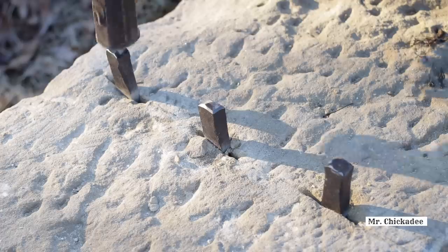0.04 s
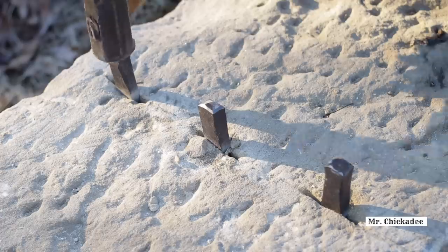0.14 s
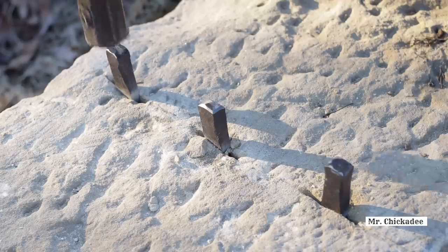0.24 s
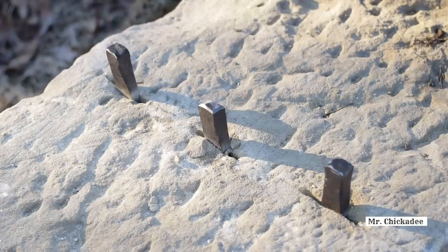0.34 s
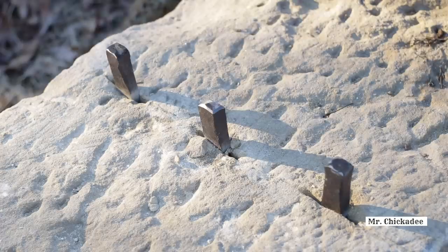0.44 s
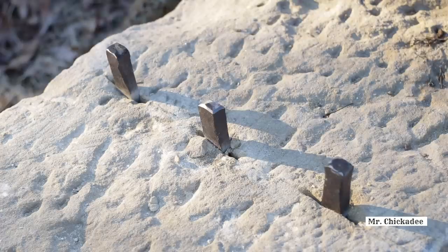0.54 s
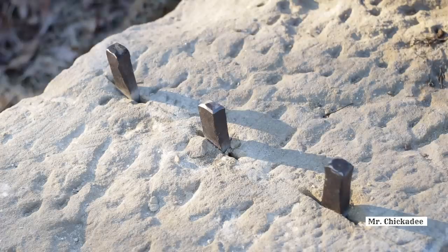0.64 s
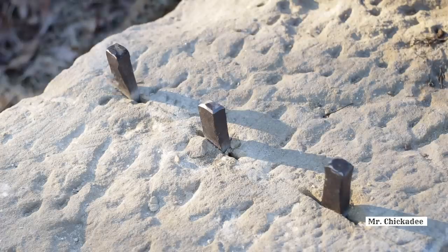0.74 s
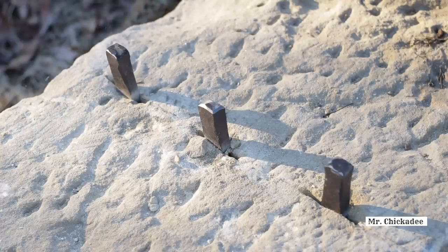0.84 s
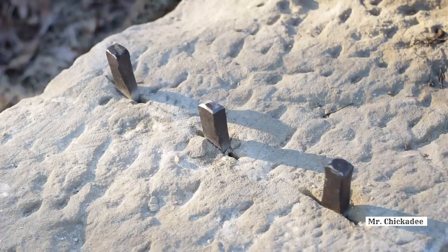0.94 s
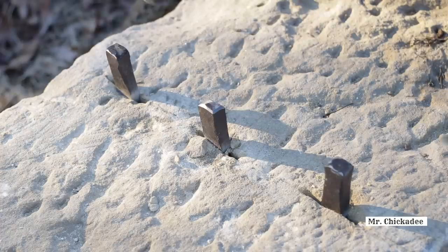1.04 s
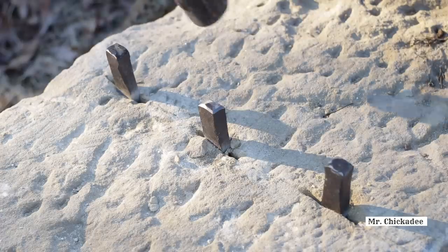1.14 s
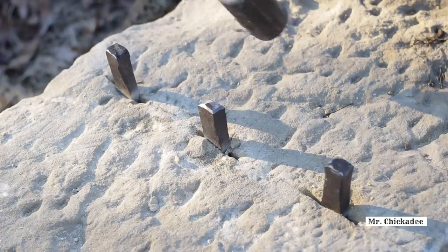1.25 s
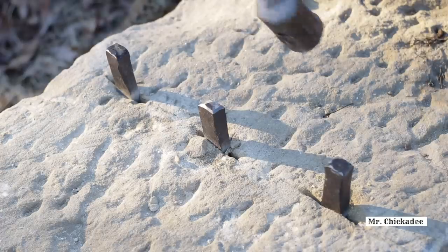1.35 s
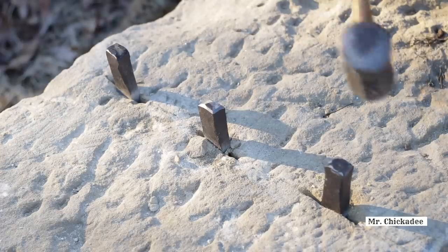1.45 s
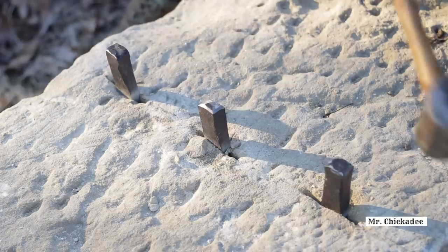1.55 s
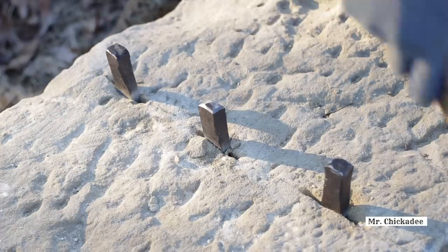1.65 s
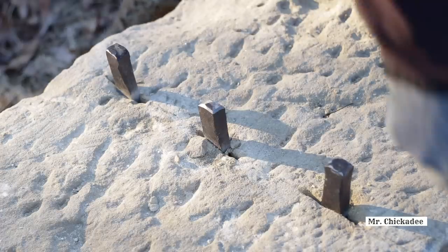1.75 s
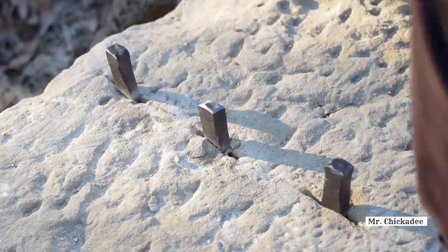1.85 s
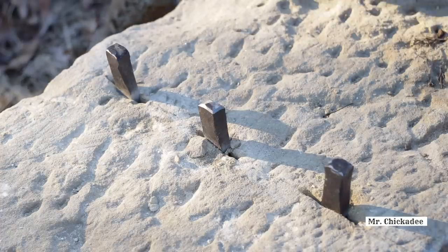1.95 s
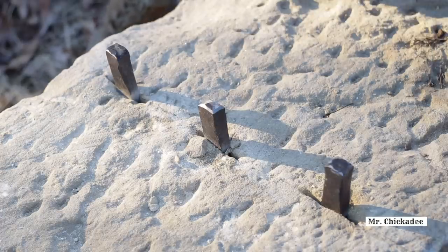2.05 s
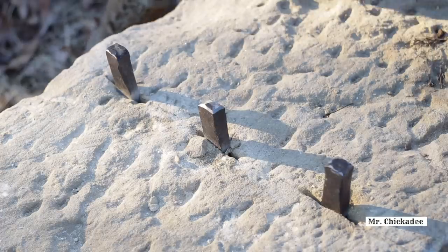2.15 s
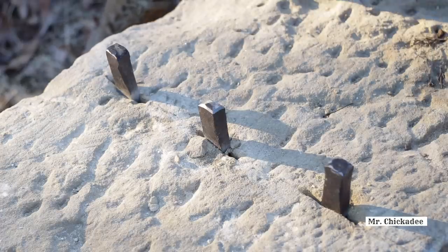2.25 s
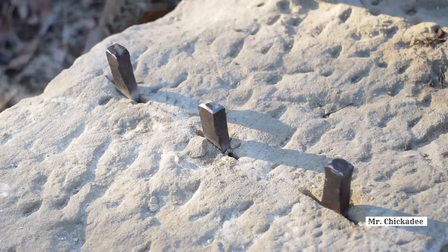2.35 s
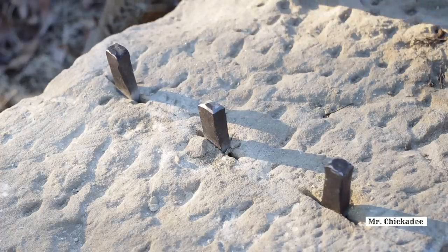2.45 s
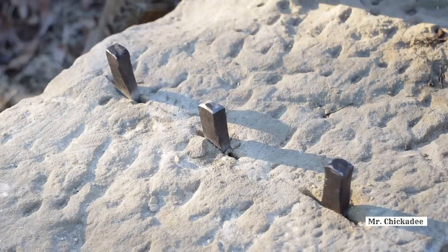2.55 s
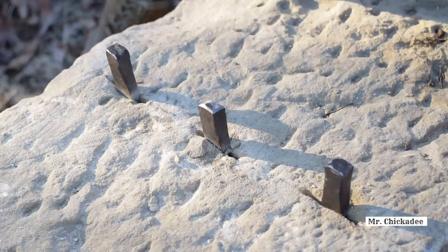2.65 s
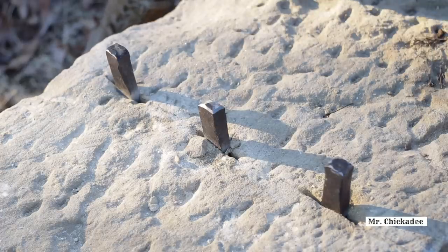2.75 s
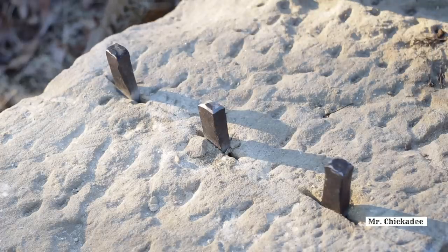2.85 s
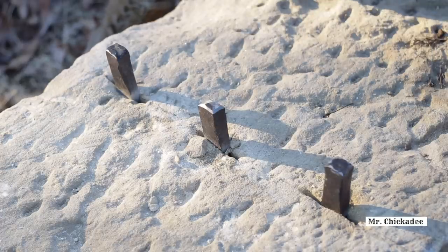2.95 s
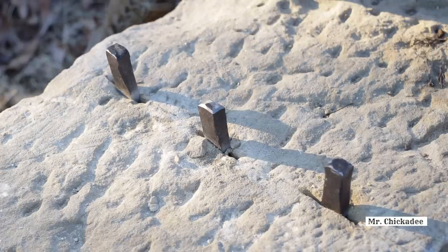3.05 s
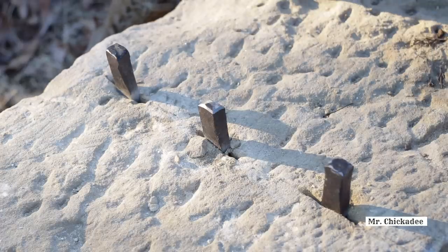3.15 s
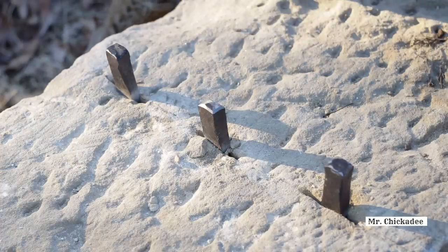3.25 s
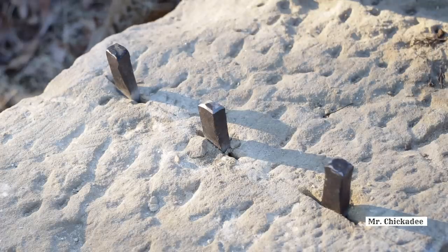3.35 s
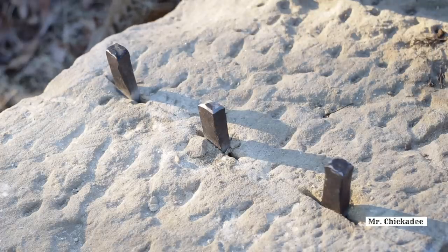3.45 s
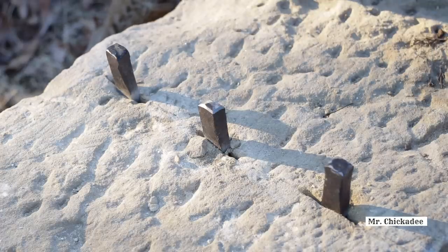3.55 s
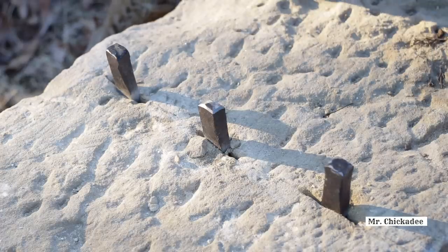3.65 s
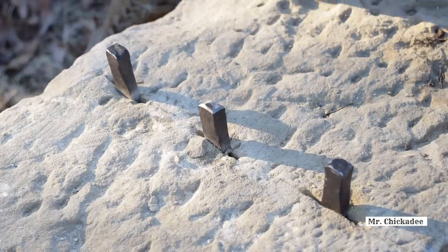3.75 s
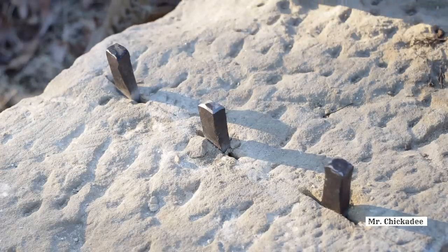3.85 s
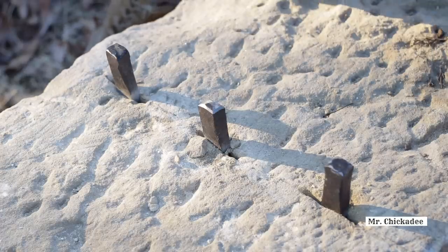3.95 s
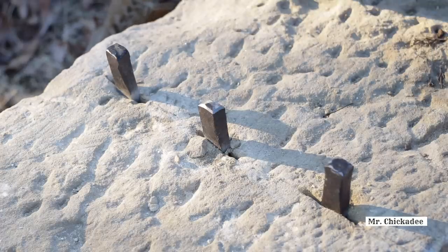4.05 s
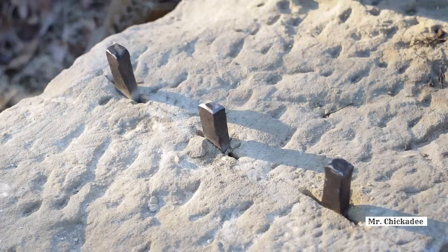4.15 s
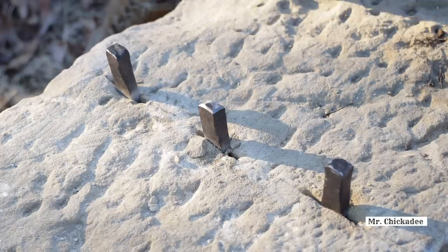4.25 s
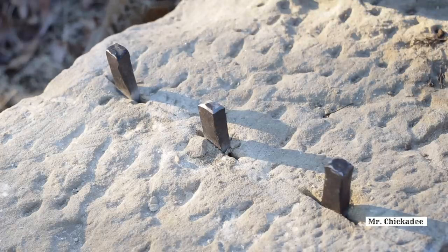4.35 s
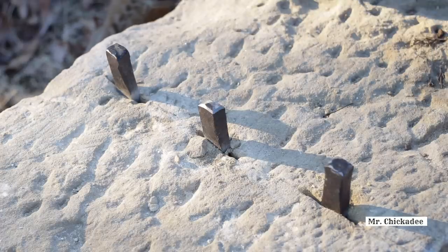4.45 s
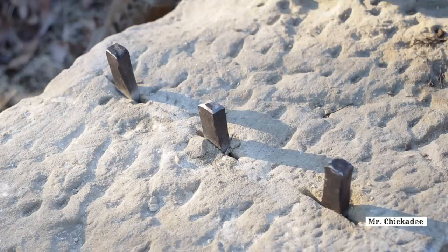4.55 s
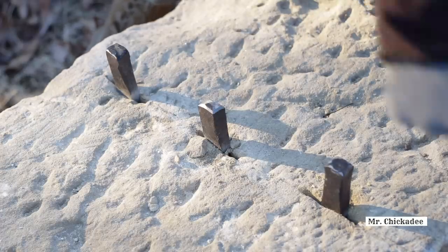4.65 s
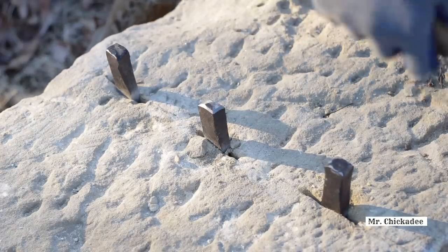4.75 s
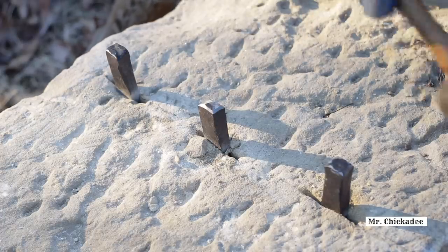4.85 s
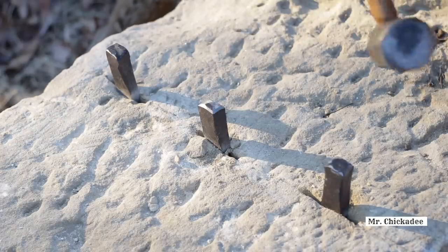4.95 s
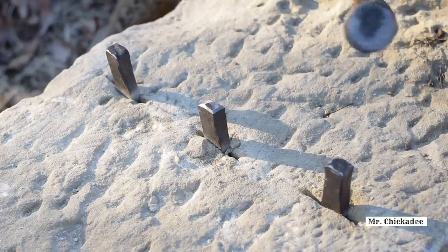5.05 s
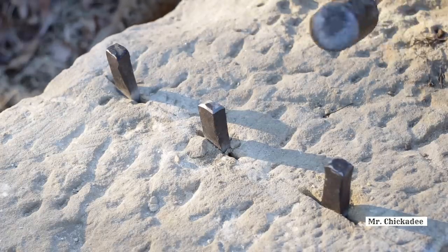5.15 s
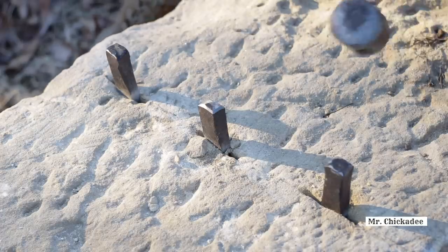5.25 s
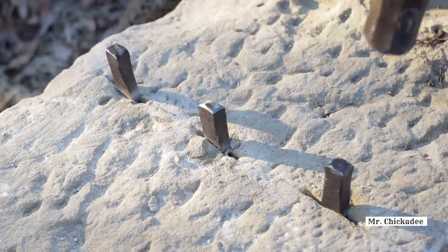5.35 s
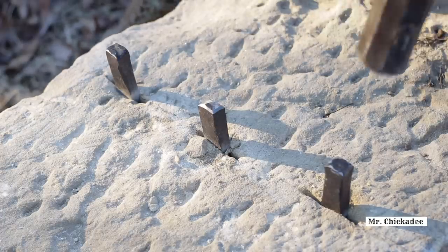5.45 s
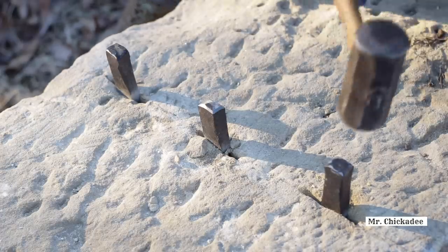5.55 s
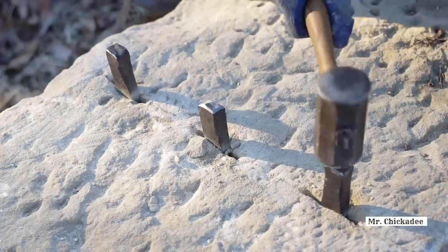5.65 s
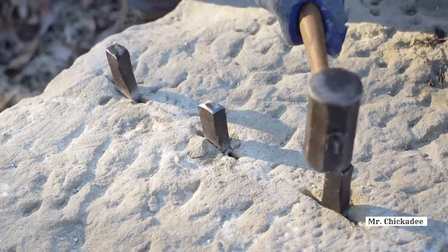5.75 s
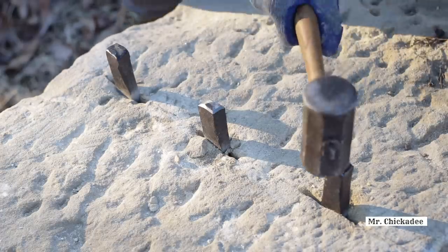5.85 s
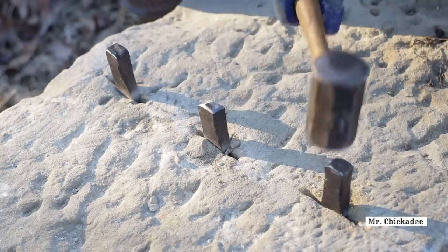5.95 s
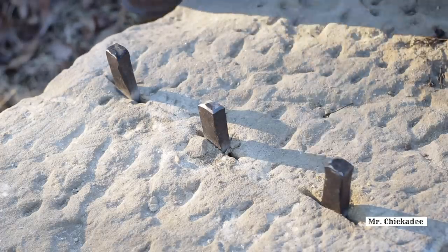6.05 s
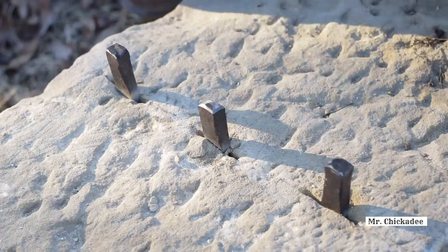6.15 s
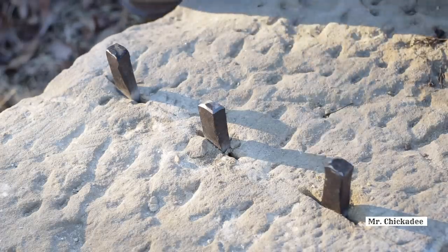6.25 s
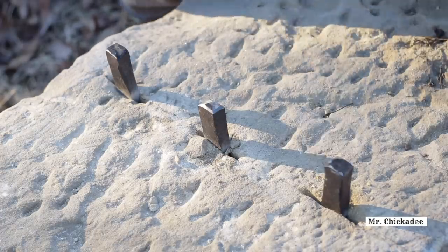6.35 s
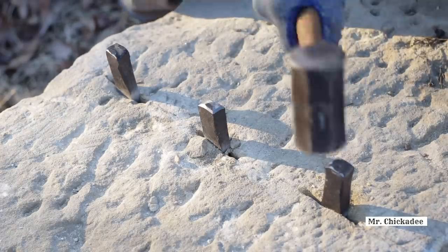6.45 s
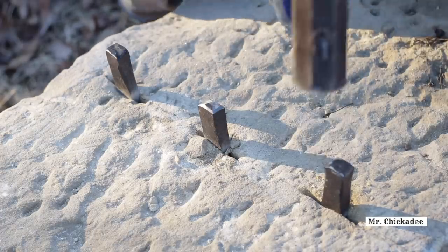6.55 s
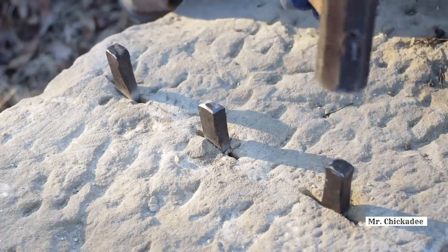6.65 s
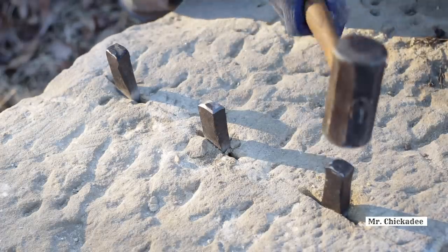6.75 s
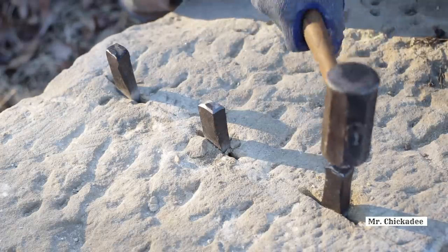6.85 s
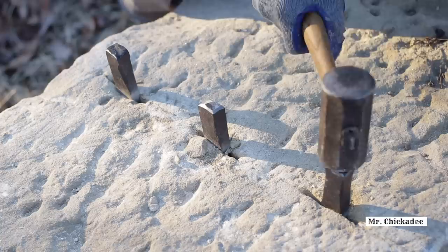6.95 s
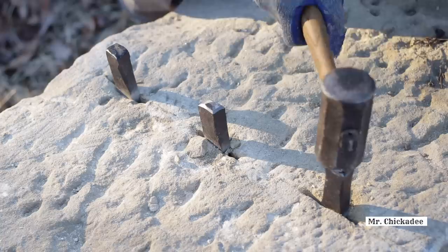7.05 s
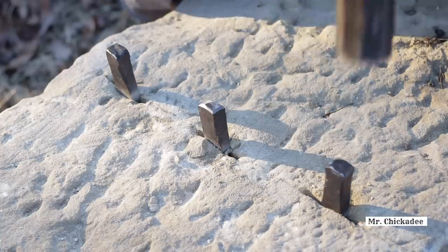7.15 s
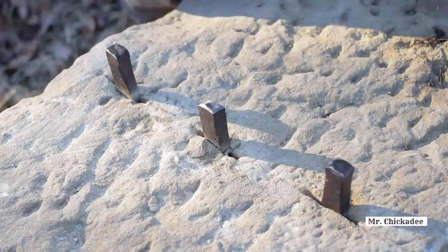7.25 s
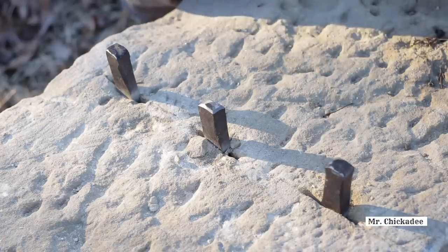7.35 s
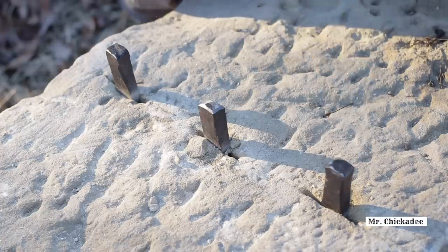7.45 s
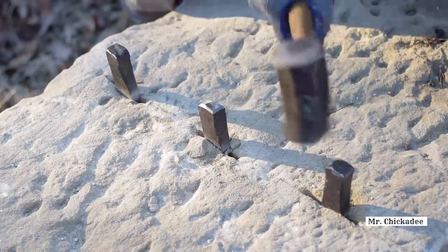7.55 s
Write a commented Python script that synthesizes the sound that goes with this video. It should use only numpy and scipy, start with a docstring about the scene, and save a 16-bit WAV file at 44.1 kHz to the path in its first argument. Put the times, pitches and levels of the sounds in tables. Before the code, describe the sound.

A near stereo microphone hears a hand hammer working along four wedges in rock. Small quick taps, sometimes bouncing, set up each single loud steel crack, the hardest slightly overloaded. Each wedge has its own clanking colour and a brief body of stone beneath. Between blows come soft sleeve swishes, tiny grit ticks, a faint far motor and two barely audible thin whistles. Quiet open woodland answers with a soft scattered echo.

```python
"""Two light taps of a hammer on a steel wedge come first, then a hard, clanking blow, outdoors and close by.
The hammer works along four wedges set in a stone block; bouncing taps lead to each hard blow, twice on the last.
Struck steel and stone are damped resonances; rocks, thicket and far trees answer with scattered noise.
Banded noise swells make rustling sleeves, trickling sand and treble echo after two hard blows; short bursts
make grit ticks, and sines a distant motor and two far whistles. The input stage overloads on the hard blows."""
import sys
import numpy as np
from scipy import signal
from scipy.fft import rfft, irfft, next_fast_len
from scipy.io import wavfile
from scipy.ndimage import uniform_filter1d

SR = 44100
rng = np.random.default_rng(int(sys.argv[2]) if len(sys.argv) > 2 else 0)


def wav_record(signal):
    """Record a signal, one row per channel, as 16-bit PCM in the file named by sys.argv[1]."""
    frames = np.transpose(np.atleast_2d(signal))
    bounded = np.clip(frames, -1, 1)
    # unit amplitude maps onto the largest positive 16-bit level
    quanta = np.round(bounded * 32767).astype(np.int16)
    wavfile.write(sys.argv[1], SR, quanta)


N = 334719
PORTS = np.array([[1], [-1]])  # sign of a left-right difference at the left and right port


def amp(db):
    """Level to amplitude: 20 dB is a factor of ten."""
    return 10 ** (np.asarray(db) / 20)


def unit(x):
    """Normalization of x to rms 1."""
    return x / np.sqrt(np.mean(x ** 2) + 1e-20)


def peak(x):
    """Normalization of x to peak 1."""
    return x / np.abs(x).max()


def along(points, hz):
    """Interpolation of (frequency [Hz], value) points on a logarithmic frequency axis."""
    f, v = np.transpose(points)
    return np.interp(np.log(hz + 1), np.log(f + 1), v)


def curves(rows):
    """Linear interpolation in time: one value per sample for each column after the time."""
    s, *cols = np.transpose(rows)
    return [np.interp(np.arange(N) / SR, s, c) for c in cols]


def filtered(x, response):
    """Linear filtering: the spectrum of x times a complex response of frequency."""
    size = next_fast_len(x.shape[-1] + 8192)  # padding leaves room for the ringing
    spectrum = rfft(x, size) * response(np.fft.rfftfreq(size, 1 / SR))
    return irfft(spectrum, size)[..., :x.shape[-1]]


def modes(table):
    """Modal superposition: damped resonances (frequency [Hz], width [Hz], level [dB]) in alternating sign."""
    def response(f):
        total = 0
        for k, (centre, width, db) in enumerate(table):
            resonance = 1j * f * width / (centre ** 2 - f ** 2 + 1j * f * width)
            total = total + (-1) ** k * amp(db) * resonance
        return total
    return response


def add(track, s, sound):
    """Superposition: mixes a stereo sound in at time s [s]."""
    start = min(round(s * SR), N)
    track[:, start:start + sound.shape[1]] += sound[:, :N - start]


# likeness of the two ports in diffuse noise: (frequency [Hz], left-right correlation)
COHERENCE = [(60, 0.64), (130, 0.2), (290, 0.99), (640, 0.41), (1410, -0.34), (3100, 0.21), (6820, 0.033),
             (15000, 0.74)]


def rush(spectrum, patchy_db):
    """Partial coherence: mid and side noise, patchy in time and pitch, share power to give the likeness."""
    z = signal.stft(rng.standard_normal((2, N)), nperseg=256)[2]
    field = uniform_filter1d(rng.standard_normal(z.shape[1:]), size=8, axis=0)
    field = uniform_filter1d(field, size=6, axis=1)
    pair = signal.istft(z * amp(patchy_db * unit(field)), nperseg=256)[1][:, :N]

    def mid_side(hz):
        turn = np.arccos(np.clip(along(COHERENCE, hz), -1, 1)) / 2
        return amp(along(spectrum, hz)) * [np.cos(turn), np.sin(turn)]

    mid, side = filtered(pair, mid_side)
    return unit(np.array([mid + side, mid - side]))


# colour of the open-air floor: (frequency [Hz], relative level per hertz [dB])
AIR_COLOUR = [(13, -48.5), (22, -19), (81, -9), (162, -11), (219, -9), (252, -11), (415, -12), (852, -13),
              (978, -12), (1800, -14.5), (3220, -18), (15200, -27.5), (16500, -39.5)]


def open_air():
    """Diffuse field: a steady, slightly patchy floor of coloured noise."""
    return amp(-59.5) * rush(AIR_COLOUR, patchy_db=1.46)


# far engine: (time [s], frequency [Hz], peak level [dB])
MOTOR_NOTE = [(0, 120, -73), (3.4, 122, -84), (3.8, 130, -70), (4.15, 133, -66.5), (4.5, 136, -71.5),
              (5.3, 137, -72.5), (5.7, 136, -75), (7.59, 138, -74)]
UPPER_S, UPPER_HALF_S, UPPER_DB = 4.08, .16, -66  # brief upper note: centre, time to fall to 1/e, peak


def motor():
    """Phase accumulation: a far engine note of drifting pitch; a second note above it passes briefly."""
    hz, db = curves(MOTOR_NOTE)
    phase = 2 * np.pi * np.cumsum(hz) / SR
    passing = np.exp(-((np.arange(N) / SR - UPPER_S) / UPPER_HALF_S) ** 2)
    return amp(db) * np.sin(phase) + amp(UPPER_DB) * passing * np.sin(phase * 8 / 5)


# far whistles: (time [s], length [s], start frequency [Hz], end frequency [Hz], peak level [dB])
GLIDES = [(3.941, .07, 1805, 1740, -69), (5.16, .17, 1716, 1790, -69)]


def whistles():
    """Linear frequency glide: thin pure tones, perhaps a far bird."""
    out = np.zeros((2, N))
    for s, length, start_hz, end_hz, db in GLIDES:
        hz = np.linspace(start_hz, end_hz, round(length * SR))
        tone = np.sin(2 * np.pi * np.cumsum(hz) / SR)
        add(out, s, amp(db) * np.sqrt(np.hanning(len(hz))) * tone[None])
    return out


# rubbing cloth, trickling sand, and treble echo swelling after two hard blows:
# (peak time [s], time to fall to 1/e [s], level before the swell [dB], centre [Hz], spread [octaves])
NOISE_SWELLS = [(1.573, .061, -52.5, 4000, 1.37), (1.641, 0.026, -49, 3000, 1.1),
                (1.715, 0.041, -53.5, 2200, 0.97), (1.928, 0.28, -61.5, 7000, 1.7),
                (2.628, .05, -60.5, 7040, 1), (3.091, 0.054, -56, 6080, 1.4),
                (4.501, .081, -50.5, 5000, 1.1), (4.627, 0.048, -60, 4500, 1),
                (4.786, .053, -46.5, 3470, .9), (5.192, 0.33, -63.5, 2200, 1.1),
                (5.393, .055, -50, 3560, 1.23), (5.59, 0.065, -57.5, 6000, 1.8),
                (6.212, 0.52, -63.5, 2470, 1.7), (7.283, .06, -56.5, 3400, 1.03),
                (7.531, .076, -62, 6000, 1.4)]


def swishes():
    """Band-limited noise: each swell is patchy noise in one broad band under a bell-shaped envelope."""
    out = np.zeros((2, N))
    noise = rush([(100, 0), (16000, 0.0066)], patchy_db=4.0)
    for s, half, db, hz, octaves in NOISE_SWELLS:
        start = max(s - 3 * half, 0)
        piece = noise[:, round(start * SR):][:, :round(6 * half * SR)]
        t = start + np.arange(piece.shape[1]) / SR
        band = lambda f: np.exp(-(np.log2((f + 1) / hz) / octaves) ** 2 / 2) / np.sqrt(f + 1)
        bell = np.exp(-((t - s) / half) ** 2)
        add(out, start, amp(db) * unit(filtered(piece, band)) * bell)
    return out


STRAY_DB, STRAY_HZ, STRAY_OCTAVES = -58, 2600, 1  # faint grains: mean level, median pitch, pitch spread


def strays(count):
    """Random arrivals: grains at uniform moments with normal spreads of level and log pitch."""
    when = rng.uniform(0, N / SR, count)
    size, pitch = rng.standard_normal((count, 2)).T
    return np.transpose([when, STRAY_DB + 3 * size, STRAY_HZ * 2 ** (STRAY_OCTAVES * pitch)])


# clearest grit and small knocks: (time [s], level [dB], frequency [Hz])
GRIT_TICKS = [(1.6568, -33.5, 1640), (1.7195, -44, 2630), (1.794, -46.5, 300), (3.058, -44, 2450),
              (3.0992, -38, 4930), (3.143, -45, 7500), (3.2287, -48, 2870), (3.8202, -50, 3500),
              (3.8924, -50, 2230), (4.4732, -41, 3730), (4.494, -38, 2700), (4.5206, -35, 2460),
              (4.5604, -41, 3770), (4.585, -40.5, 3630), (5.46, -35, 1900), (5.541, -42, 2600),
              (5.5624, -46, 3300), (5.9454, -47, 2300), (6.0082, -47, 2370), (6.1984, -36, 1370),
              (6.3084, -46.5, 3500), (6.341, -45, 5000), (6.3909, -43.5, 2600), (6.6024, -36.5, 3730),
              (6.7865, -38.5, 5800), (6.799, -42, 6900), (7.215, -46.5, 1450), (7.256, -39.5, 2920),
              (7.4589, -44.5, 1520)]
TICK_WIDTH, TICK_PAN_DB = 1, -6  # resonance width as a share of the pitch; left minus right


def grit():
    """Impulsive excitation: a burst of tiny impacts on the stone rings one broad resonance, applied twice."""
    out, t = np.zeros((2, N)), np.arange(SR // 40) / SR
    for s, db, hz in [*GRIT_TICKS, *strays(count=30)]:
        crumbs = rng.standard_normal(len(t)) * amp(-60 * t / 0.017) * (1 - np.exp(-t / 0.00078))
        tick = peak(filtered(crumbs, lambda f: modes([(hz, TICK_WIDTH * hz, 0)])(f) ** 2))
        add(out, s, amp(db + PORTS * TICK_PAN_DB / 2) * tick)
    return out


def swell(peak_s, steep):
    """Diffuse scattering: noise that rises and fades, as from many scatterers at many distances."""
    u = np.arange(SR) / SR / peak_s * steep
    scatter = u ** steep * np.exp(-u) * rng.standard_normal((2, SR))
    return scatter / np.linalg.norm(scatter[0])


# colour of the far trees' echo: (frequency [Hz], level [dB])
TREE_COLOUR = [(150, -16.5), (300, -9), (500, -7.5), (750, 2), (1050, 3), (1500, -15.5), (3000, -18.5),
               (8000, -39)]


def trees(peak_s):
    """Distant diffuse echo: a low swell of coloured noise for trunks tens of metres off."""
    return filtered(swell(peak_s, steep=2.5), lambda hz: amp(along(TREE_COLOUR, hz)))


# colour that the branches give their echo: (frequency [Hz], level [dB])
THICKET_COLOUR = [(150, -10), (500, -4.5), (1000, -1.5), (2200, 8), (5000, 1), (7500, 6.5), (10000, -7.5),
                  (15000, -17.5)]


def thicket(sound, peak_s):
    """Multiple scattering: branches hear the blow from all sides and return only its broad colour."""
    broad = np.sqrt(np.abs(uniform_filter1d(np.abs(rfft(sound)) ** 2, size=300)))
    grid = np.fft.rfftfreq(len(sound), 1 / SR)
    colour = lambda hz: np.interp(hz, grid, broad) * amp(along(THICKET_COLOUR, hz))
    return filtered(swell(peak_s, steep=1.5), colour)


# scatter off rocks and the worker: (frequency [Hz], time to fall 60 dB [s])
NEARBY_DECAY = [(200, 0.086), (700, 0.066), (2000, 0.027), (6000, 0.032), (12000, .02)]


def nearby(sound):
    """Frequency-dependent decay: the sound convolved with a short noise tail."""
    hz, t, z = signal.stft(rng.standard_normal((2, SR // 10)), SR, nperseg=128)
    decay = amp(-60 * t / along(NEARBY_DECAY, hz)[:, None])
    tail = signal.istft(z * decay, SR, nperseg=128)[1]
    delayed = np.pad(sound, (90, 0))[None]  # 2 ms
    return signal.fftconvolve(delayed, tail / np.linalg.norm(tail[0]), axes=1)


# each wedge rocking in its slot: (frequency [Hz], width [Hz], level [dB])
WEDGE_MODES = [
    [(922, 590, -17.5), (1230, 500, 20), (1635, 350, 4.5), (2450, 710, -2), (3730, 130, -21.5),
     (4100, 1200, -17)],
    [(760, 90, -7.5), (1060, 72, -1.5), (1370, 220, -2), (1900, 150, -3.5), (2180, 310, -15),
     (2870, 120, -1.5), (3800, 350, -14), (4730, 910, -9.5)],
    [(743, 82, -6.5), (1380, 320, -2.5), (1988, 150, 0.5), (2480, 240, -9), (2740, 680, -21.5),
     (3380, 600, -1), (3870, 1500, -3.5), (5070, 1200, -4.5)],
    [(1074, 320, -6.5), (1321, 220, 1.5), (1470, 86, 5), (2080, 320, 3), (2800, 1600, -5.5),
     (4000, 490, -5.5), (4970, 230, -9.5)],
]
# steel of each wedge, clanking: (frequency [Hz], width [Hz], level [dB])
CLANK_MODES = [
    [(2103, 170, 6), (3380, 950, -1), (5850, 200, -6.5), (6530, 660, -4.5), (8690, 85, 7),
     (12000, 530, -53.5), (13300, 330, -21), (14800, 740, -29)],
    [(1030, 57, -11.5), (2280, 300, -2.5), (2970, 250, -9), (3400, 620, -4), (4500, 350, -15.5),
     (5000, 84, -10.5), (5425, 380, -1), (6640, 310, -4), (6700, 890, 1), (7900, 190, -12),
     (8300, 1400, -9), (11400, 800, -20.5), (12600, 600, -25.5), (14500, 700, -25)],
    [(1053, 170, -8.5), (2110, 470, -6), (2740, 1200, -7), (3940, 570, -15.5), (3940, 200, -12),
     (5250, 360, -10), (7070, 950, -4), (7360, 660, -10), (7720, 190, -14.5), (8400, 740, -6),
     (11500, 1100, -12), (13000, 900, -27), (14740, 800, -23.5)],
    [(1080, 400, -6.5), (2040, 260, -11), (3240, 1400, -8.5), (4040, 400, -3.5), (5380, 220, -6),
     (6980, 370, 5), (8450, 110, 0.5), (9500, 1040, -5), (10700, 350, -20), (13500, 340, -28),
     (14800, 400, -17)],
]
# the stone: (frequency [Hz], width [Hz], level as driven from each of the four wedges [dB] x 4)
BLOCK_MODES = [(100, 150, -16.5, -24.5, -18, -18.5), (191, 36, 5.5, -11.5, -21, -3),
               (281, 36, 5, -3, 1, -2), (440, 30, -1.5, -11, -12.5, -5.5), (513, 38, 2.5, -6.5, -3.5, -5),
               (615, 55, 2, -7.5, -6.5, 5), (776, 94, -7.5, -5, -3.5, 1), (850, 27, -13, -10, -0.5, -15)]
# for each wedge: (time until reseating halves its rocking [s])
ROCKING_HOLD = [0.0052, 0.0046, 0.0044, 0.0047]
# for each wedge: (time until choking halves its clank [s])
STEEL_HOLD = [0.0011, 0.0034, 0.0036, 0.001]
# springing of each driven wedge in the stone: (level relative to the clank [dB])
BITE_LEVEL = [-26, -18.5, -18, -35]
# for each wedge: (head ring relative to the clank [dB], rock-face echo [dB], left-right of duller parts [dB])
SEATING = [(-60, -42.5, 0), (-59, -35.5, 1.5), (-54.5, -28, 0.5), (-57.5, -46.5, -1.5)]
# for each wedge: (chatter time to fall 60 dB [s], left-right of the clank [dB],
# low echo under a 0 dB clank [dB], thicket echo [dB], far-tree echo peak time [s], block-top reflection [dB])
WEDGE_ANSWERS = [(0.048, 4.5, -4.5, -35, 0.14, -22.5), (.02, -4.5, -2.5, -33, .19, -14.5),
                 (0.032, -7, 4.5, -37.5, 0.2, -16.5), (0.024, -5, -16, -39, .15, -8)]
HEAD_HZ = 12720  # free ring of the hammer head
BITE_HZ, BITE_WIDTH_HZ = 1025, 220
THUD_DB, THUD_FOLLOWS = -21, 0.18  # block thud under a 0 dB clank; dB gained per dB of clank


def blow(wedge, rock_db, clank_db, corner_hz):
    """Impact excitation: a push and chatter ring wedge, block and head; a softer contact is duller."""
    t = np.arange(SR // 4) / SR
    impulse = (t == 0).astype(float)
    ring_db, _, dull_pan_db = SEATING[wedge]
    chatter_t60, pan_db = WEDGE_ANSWERS[wedge][:2]
    chatter = amp(-60 * t / max(chatter_t60, .002)) * rng.standard_normal((2, len(t)))
    push, crack = impulse + chatter * amp([[-27], [-16]])

    soft = lambda f: 1 / (1 + 1j * f / corner_hz) ** 2
    choke = lambda hold: 1 / (1 + (t / hold) ** 3)
    rocking = peak(filtered(push, lambda f: soft(f) * modes(WEDGE_MODES[wedge])(f)))
    clank = peak(filtered(crack, lambda f: soft(f) * modes(CLANK_MODES[wedge])(f)))
    thud = peak(filtered(impulse, modes(np.array(BLOCK_MODES)[:, [0, 1, 2 + wedge]])))
    ring = amp(ring_db - 60 * t / 0.11) * np.sin(2 * np.pi * HEAD_HZ * t)
    # the driven wedge springs in the stone, and no seating chokes this part
    bite = peak(filtered(impulse, lambda f: modes([(BITE_HZ, BITE_WIDTH_HZ, 0)])(f) ** 2))

    dull = amp(clank_db + BITE_LEVEL[wedge]) * bite
    dull = dull + amp(rock_db) * choke(ROCKING_HOLD[wedge]) * rocking
    dull = dull + amp(THUD_DB + THUD_FOLLOWS * clank_db) * thud
    bright = choke(STEEL_HOLD[wedge]) * clank + ring
    return amp(PORTS * dull_pan_db / 2) * dull + amp(clank_db + PORTS * pan_db / 2) * bright


# contacts: (time [s], rocking level [dB], clank level [dB], contact corner frequency [Hz])
CONTACTS = [(.1216, -3.5, -8.5, 2650), (.226, -9.5, -14, 1950), (0.7506, 3.5, 1, 9500),
            (2.0861, -6, -15.5, 5000), (2.2025, -7, -17.5, 4000), (2.8731, -30, 5.5, 12000),
            (3.3701, -1.5, -12, 8000), (3.503, -2, -14.5, 5800), (3.5904, -9, -23, 4500),
            (4.2761, -7.5, 0, 12000), (5.716, -3.5, -8, 6200), (5.8221, -3.5, -11, 5000),
            (5.8612, -14.5, -31, 3000), (5.8899, -17, -33.5, 2950), (6.4483, -7, 6.5, 12000),
            (6.9016, -3.5, -13, 4000), (6.985, -5.5, -12, 4000), (7.03, -9.5, -27, 3150),
            (7.0726, -19.5, -53, 2500), (7.5863, -4, 10, 12000)]
# moves of the hammer to the next wedge: (time [s])
WEDGE_MOVES = [1.5, 3.1, 5]
# for each wedge: (lateness of the left port [samples])
PORT_LAG = [.5, 2, 2, 1.5]
TOP_DELAY_S = 0.000653  # extra path by way of the block's top
BOOM_FOLLOWS = 1.2  # dB gained by the low echo per dB of clank
THICKET_SOONER = .75  # thicket peak time as a share of the far trees'


def hammer():
    """Direct sound and reflections: each contact reaches the right port first, with near and far answers."""
    out = np.zeros((2, N))
    for s, rock_db, clank_db, corner_hz in CONTACTS:
        wedge = np.searchsorted(WEDGE_MOVES, s)
        boom_db, thicket_db, echo_s, top_db = WEDGE_ANSWERS[wedge][2:]
        late = lambda f: np.exp(-2j * np.pi * f * (3 + PORTS * PORT_LAG[wedge] / 2) / SR)
        off_top = lambda f: 1 + amp(top_db) * np.exp(-2j * np.pi * f * TOP_DELAY_S)
        sound = filtered(blow(wedge, rock_db, clank_db, corner_hz), off_top)
        mono = sound.mean(axis=0)
        add(out, s, filtered(sound, late))
        add(out, s, amp(-18.5) * nearby(mono))
        # a rock face five metres off
        rock_face = filtered(sound, modes([(1480, 150, 0.0074)]))
        add(out, s + 0.033, amp(SEATING[wedge][1]) * rock_face)
        add(out, s, amp(thicket_db) * thicket(mono, THICKET_SOONER * echo_s))
        add(out, s, amp(boom_db + BOOM_FOLLOWS * clank_db) * trees(echo_s))
    return out


def scene():
    """Superposition of all sources over the open-air floor."""
    return hammer() + grit() + swishes() + motor() + whistles() + open_air()


def record(dry):
    """Saturation and band limiting: the input stage flattens the hardest peaks, then cuts the top."""
    ceiling, knee, top_hz = .6, 3.7, 16500
    flat = dry / (1 + np.abs(dry / ceiling) ** knee) ** (1 / knee)
    return filtered(flat, lambda hz: hz < top_hz)


dry = scene()
out = record(dry)
wav_record(out)
```